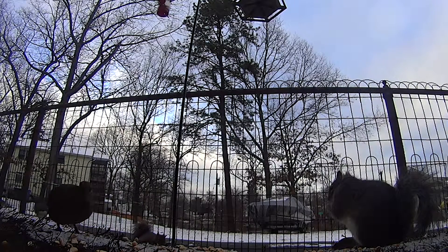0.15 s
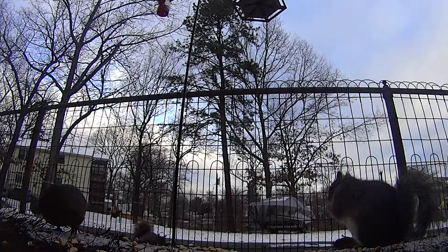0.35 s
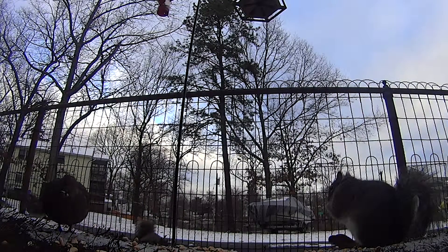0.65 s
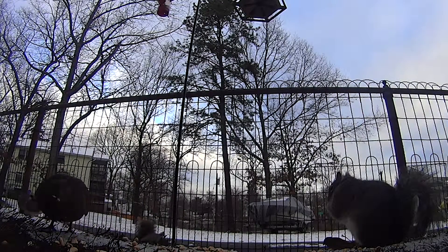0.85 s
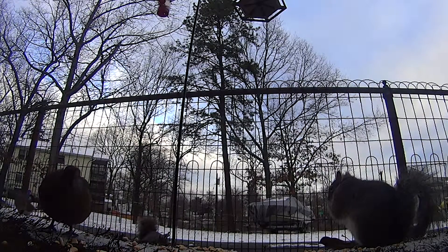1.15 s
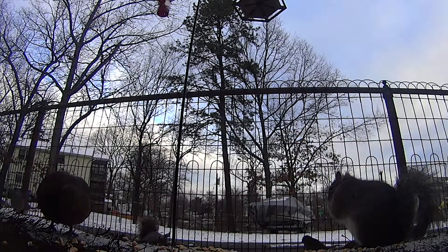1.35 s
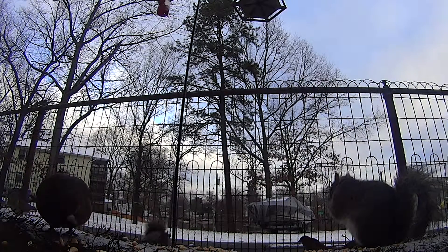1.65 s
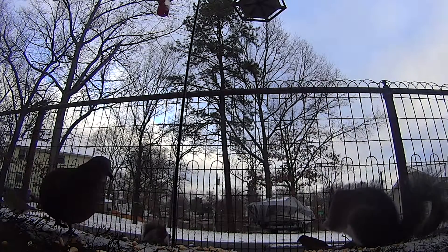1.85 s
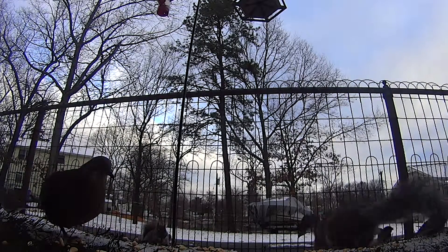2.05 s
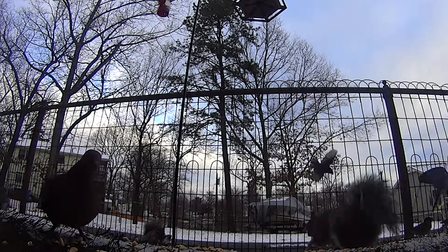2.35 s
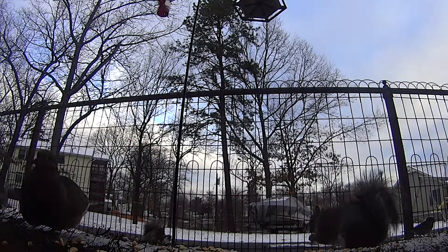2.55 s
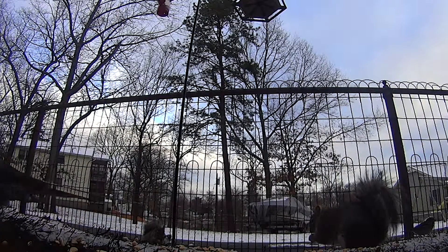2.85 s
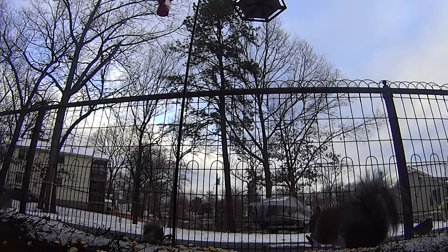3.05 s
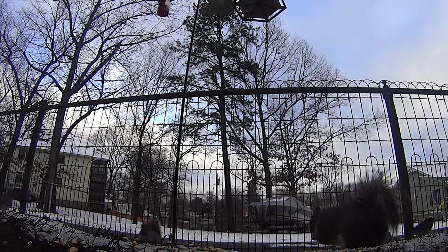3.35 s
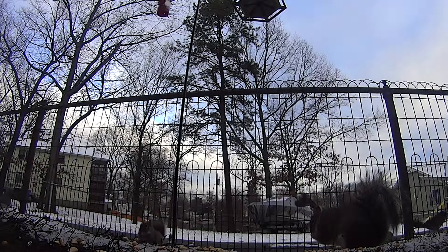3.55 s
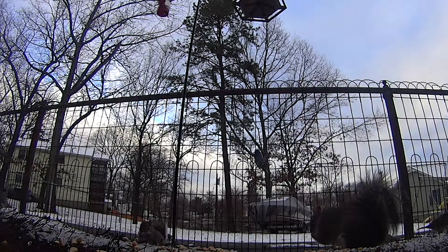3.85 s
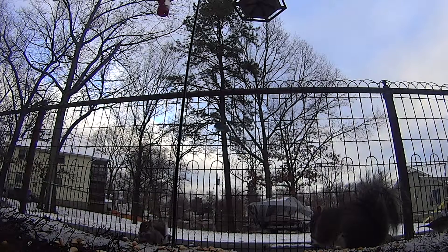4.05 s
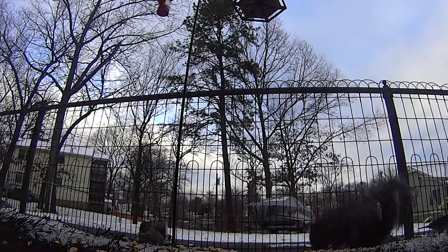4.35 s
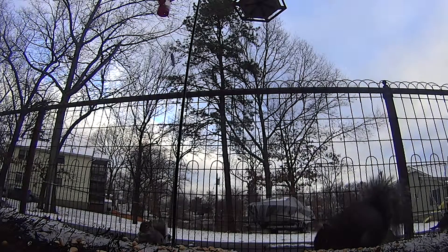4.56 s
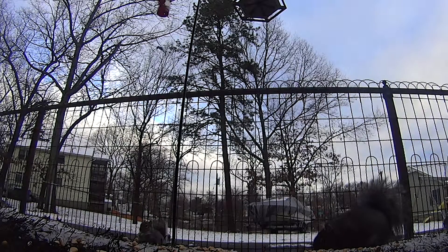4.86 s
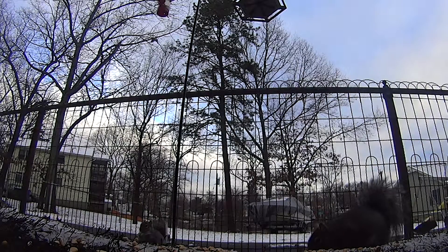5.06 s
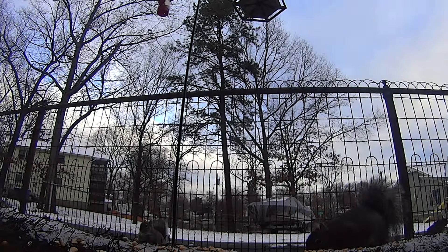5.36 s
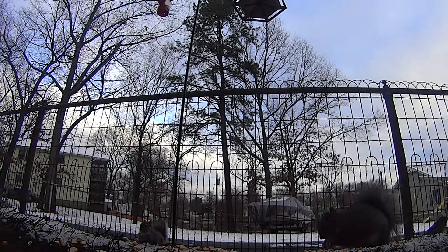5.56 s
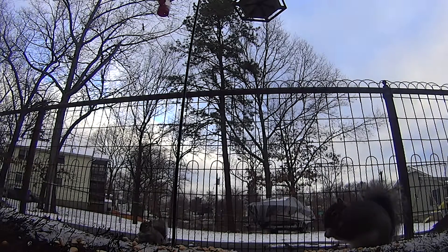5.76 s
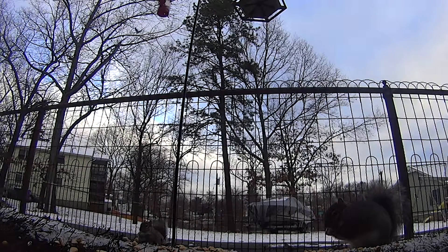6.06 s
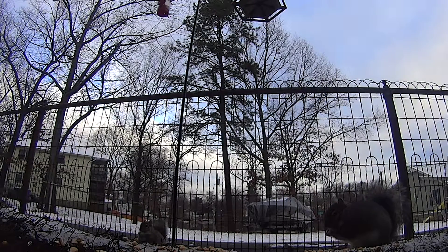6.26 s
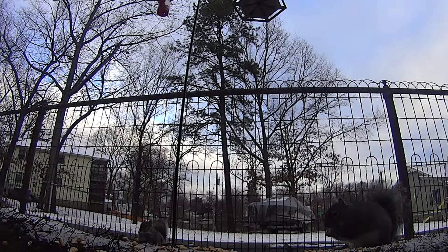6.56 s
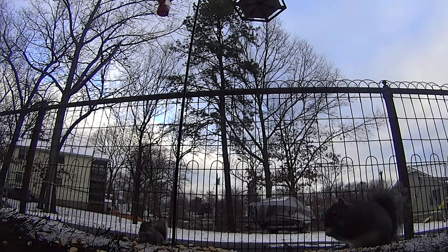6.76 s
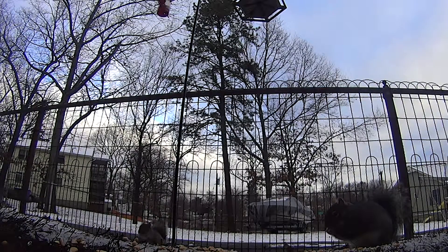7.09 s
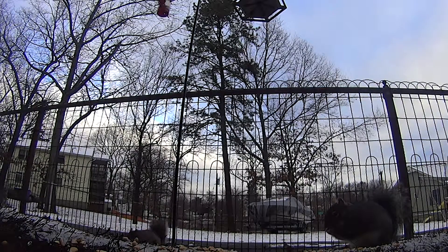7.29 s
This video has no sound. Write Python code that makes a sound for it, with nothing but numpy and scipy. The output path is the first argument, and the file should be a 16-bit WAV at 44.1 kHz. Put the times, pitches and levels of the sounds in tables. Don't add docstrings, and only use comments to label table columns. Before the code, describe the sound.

Quiet hiss with tiny seed clicks, then scuffling thumps, fluttering wing whistles, one sharp double snap up close, and the whistles fading away.

```python
import sys
import numpy as np
from scipy import signal
from scipy.fft import rfft, irfft, next_fast_len
from scipy.io import wavfile
from scipy.ndimage import uniform_filter1d

SR = 44100
rng = np.random.default_rng(int(sys.argv[2]) if len(sys.argv) > 2 else 0)


def digitize_waveform(pressure):
    field = np.atleast_2d(pressure).T
    bounded = np.clip(field, -1, 1)
    quanta = np.round(bounded * 32767).astype(np.int16)
    wavfile.write(sys.argv[1], SR, quanta)


def convert_level_to_amplitude(level_db):
    exponent = np.asarray(level_db, float) / 20
    return 10 ** exponent


N = 327507

CAVITY_HZ, CAVITY_T60_S, CAVITY_SIDE_DB = 1619, 0.018, -12
GROUND_HZ, GROUND_SIDE_DB = 296, 2.5


def level(x, db):
    return x * convert_level_to_amplitude(db) / np.sqrt(np.mean(np.abs(x) ** 2))


def decay(hz, t60, u):
    return np.exp((2j * np.pi * hz - np.log(1000) / t60) * u)


def mode(x, hz, t60):
    pole = np.exp(2j * np.pi * hz / SR - np.log(1000) / (t60 * SR))
    return signal.lfilter([1], [1, -pole], x)


def ports(z, side_db, middle_db=0):
    return np.array([convert_level_to_amplitude(middle_db) * z.imag, -convert_level_to_amplitude(side_db) * z.real])


def add(out, t, x):
    i = int(round(t * SR))
    out[..., i:i + x.shape[-1]] += x[..., :N - i]


def coloured(points, db):
    hz, gain_db = np.transpose(points)
    n = next_fast_len(N, True)
    f = np.arange(n // 2 + 1) * SR / n + 1
    gain = convert_level_to_amplitude(np.interp(np.log(f), np.log(hz), gain_db))
    return level(irfft(rfft(rng.standard_normal(n)) * gain, n)[:N], db)


def grains(size, rate, spread_db):
    hit = rng.random(size) < rate / SR
    size_db = spread_db * np.minimum(rng.exponential(size=size), 3.5)
    x = hit * rng.choice([-1., 1.], size) * convert_level_to_amplitude(size_db)
    return x / np.sqrt(np.mean(x ** 2) + 1e-12)


# pitch_hz, density_db (per Hz)
AIR_SPECTRUM = [(18, -37), (30, -4.5), (108, -0.5), (196, -2), (277, -5), (501, -9.5), (582, -9.5),
                (1350, -13.5), (1640, -9), (2150, -15), (6880, -17), (10200, -18), (11000, -20),
                (14300, -122), (22000, -120)]
# pitch_hz, density_db (per Hz)
HISS_SPECTRUM = [(18, -56.5), (30, -29.5), (233, -9), (291, -2.5), (329, -14.5), (373, -7.5), (596, -8),
                 (642, -7), (1640, -10), (11000, -28), (14300, -65.5), (22000, -120)]


def air_and_hiss():
    return np.array([coloured(AIR_SPECTRUM, -60.5), coloured(HISS_SPECTRUM, -58.5)])


# time_s, level_db (over calm)
RESTLESSNESS = [(0, 3), (.45, 1), (1.2, 1), (2.0, 5), (2.29, 12), (2.5, 9), (2.98, 4.5), (3.37, 10),
                (3.62, -1), (3.92, 9), (4.0, 26.5), (4.14, 9), (4.71, 4.5), (5.15, 0.5), (5.69, 3.5),
                (6.0, -3), (6.41, 4.5), (7.43, -0.5)]


def shuffle():
    calm_ground_db, calm_seed_db, seed_share = -73.5, -70, 0.7
    stir_db = np.interp(np.arange(N) / SR, *np.transpose(RESTLESSNESS))
    steps = uniform_filter1d(grains(N, rate=190, spread_db=2.5), size=30)
    ground = level(mode(steps, GROUND_HZ, t60=0.072), 0) * convert_level_to_amplitude(calm_ground_db + stir_db)
    seeds = grains(N, rate=600, spread_db=3.0)
    ticks = level(mode(seeds, CAVITY_HZ, t60=0.013), 0) + level(mode(seeds, 4880, t60=0.0048), -11)
    ticks = ticks * convert_level_to_amplitude(calm_seed_db + seed_share * stir_db)
    return ports(ground, GROUND_SIDE_DB) + ports(ticks, CAVITY_SIDE_DB)


def cavity_lift(hz):
    return 1 + 3 / (1 + ((hz - CAVITY_HZ) / 150) ** 2)


def downstroke(ms, hz, db, glide, arch):
    n = int(ms * SR / 1000)
    u = np.arange(2 * n) / n - 0.5
    chance = rng.standard_normal((4, 5000))
    wobble = 9 * uniform_filter1d(chance[:2], size=80)[:, :2 * n]
    far = np.clip((-db - 34.5) / 18, 0, 1)

    late = np.clip(u - 0.42, 0, 1)
    along = np.minimum(u, 0.5)
    held = hz + glide * along - 4 * arch * along ** 2
    collapse = np.maximum(held - 1500, 0) * np.tanh(late / 0.24)
    gathering = 140 * np.exp(-(u + 0.5) / 0.065)
    pitch = held - collapse - gathering + (25 + 20 * far) * wobble[0]
    phase = 2 * np.pi * np.cumsum(pitch) / SR

    fade = np.clip((u + 0.5) / 0.055, 0, 1) * np.exp(-late / 0.16)
    stroke = fade * convert_level_to_amplitude(db + (1 + 2.05 * far) * wobble[1] - 10.5 * u ** 2)
    other_wing = 0.27 * far * np.exp(1.055j * phase + 1j * wobble[1])
    both = np.exp(1j * phase) + other_wing
    lift = cavity_lift(pitch) / cavity_lift(hz)
    octave = convert_level_to_amplitude(-7.5) / (1 + ((2 * pitch - 4850) / 250) ** 2)
    swish = convert_level_to_amplitude(-47) * mode(chance[2, :2 * n], hz, t60=0.0061)
    swish += convert_level_to_amplitude(-42) * mode(chance[3, :2 * n], 4900, t60=0.0052)
    return ports(stroke * (lift * both + octave * np.exp(2j * phase) + swish), side_db=-13)


# centre_s, pitch_hz, peak_db
CLIMBING_DOVE = [(3.372, 2330, -65), (3.458, 2200, -64), (3.547, 2280, -65), (3.607, 2310, -66),
                 (3.75, 2120, -62), (3.82, 2355, -58.5), (3.898, 2350, -65), (4.054, 2350, -54),
                 (4.134, 2355, -57), (4.215, 2326, -56.5), (4.301, 2260, -57.5), (4.398, 2255, -57.5),
                 (4.487, 2380, -56.5), (4.576, 2230, -58.5), (4.677, 2194, -57.5), (4.81, 2200, -59.5),
                 (4.913, 2150, -60), (5.04, 2230, -61), (5.128, 2350, -59.5), (5.243, 2000, -61.5),
                 (5.411, 2090, -63.5), (5.575, 2010, -69), (5.755, 2120, -66.5)]
# centre_s, length_ms,
# pitch_hz, peak_db
GENTLE_STROKES = [(2.657, 34, 2120, -54), (3.76, 22, 1863, -55.5), (3.858, 24, 1914, -53),
                  (6.431, 15, 2120, -62), (6.513, 14, 2280, -61.5), (6.852, 16, 2100, -61),
                  (3.232, 53, 1850, -54), (3.328, 21.7, 1758, -39.5), (3.48, 17, 1760, -62),
                  (3.503, 13, 1680, -48), (3.566, 26, 1725, -61), (3.609, 35, 1750, -52),
                  (3.688, 31, 1847, -49.5), (3.948, 15, 2404, -32.5), (4.092, 36, 1524, -54),
                  (4.188, 11.5, 1650, -57), (4.273, 24, 1695, -59.5), (4.335, 16, 1620, -59),
                  (4.359, 14, 1800, -57.5), (4.432, 16, 1560, -60), (4.453, 16.3, 1840, -51.5),
                  (4.545, 20, 1665, -65), (4.638, 38, 1770, -64)]
# centre_s, length_ms, pitch_hz, peak_db
STARTLED_FLAPS = [(2.189, 24, 1960, -55.5), (2.263, 12, 1540, -52.5), (2.27, 19, 2120, -51.5),
                  (2.362, 24.3, 1940, -50.5), (2.757, 17, 2060, -58), (2.857, 16, 1970, -58),
                  (3.912, 15, 1850, -55), (6.194, 18, 2030, -68), (6.964, 14, 2050, -64)]


def wings():
    out = np.zeros((2, N))
    strokes = [(t, 35, hz, db, -170, 80) for t, hz, db in CLIMBING_DOVE]
    strokes += [(*row, -20, 120) for row in GENTLE_STROKES]
    strokes += [(t, ms, hz, db, -21.5 * ms, 120) for t, ms, hz, db in STARTLED_FLAPS]
    for t, ms, hz, db, glide, arch in strokes:
        add(out, t - ms / 2000, downstroke(ms, hz, db, glide, arch))
    return out


def footfall(db, hz, knock_db, heave_db, t60):
    u = np.arange(SR // 5) / SR
    a, b, c, e = rng.random(size=4)
    partials = [(hz, 0, max(t60, 0.02), 0), (hz * 1.284, -8, 0.06, a),
                (520 + 30 * b, knock_db, 0.04, 0), (670 + 30 * b, knock_db, 0.04, b),
                (900 + 200 * e, knock_db - 4, 0.02, 0)]
    ring = sum(convert_level_to_amplitude(g) * decay(f, d, u) * np.exp(2j * np.pi * turn) for f, g, d, turn in partials)
    heave = decay(66 + 10 * c, 0.21, u) + decay(112 + 20 * c, 0.21, u)
    heave = convert_level_to_amplitude(heave_db) * heave / 1.36
    push = 1 - np.exp(-u / 0.0024)
    return convert_level_to_amplitude(db + 2) * push * (ports(ring, GROUND_SIDE_DB) + ports(heave, side_db=-12))


# start_s, peak_db, ring_hz, knock_db (of the mount), heave_db
HOPS = [(2.012, -47.5, 243, -11, -23), (2.119, -49, 330, -9, -2.5), (2.147, -44, 286, -5.5, -18),
        (2.168, -46.5, 350, -13, -5.5), (2.182, -35, 302, -12.5, -18), (2.742, -46, 387, -0.5, -23),
        (2.753, -46.5, 250, -23, -27), (2.798, -44, 300, -9, -29), (3.057, -41, 306, -13.5, -26),
        (3.205, -36.5, 360, -5, -23), (3.241, -42, 202, -4, -12), (3.255, -39, 333, -21, -4.5),
        (3.265, -33.5, 314, -11, -13), (3.931, -38.5, 259, -6.5, -7.5), (3.942, -35.5, 320, -3.5, -22),
        (3.965, -38, 230, -3, -6), (3.978, -44.5, 402, -0.5, -16), (3.995, -41, 205, -15, -10),
        (4.022, -42.5, 306, -7, -16), (6.644, -48.5, 205, -7, -7)]
# start_s, peak_db, ring_hz
STEPS = [(0.464, -55.5, 238), (1.911, -59, 205), (2.363, -53, 227), (2.456, -54, 275), (2.924, -52, 283),
         (3.336, -46.5, 296), (4.576, -56, 290), (5.011, -50.5, 295), (5.204, -44, 294), (5.562, -58, 303),
         (5.606, -56.5, 218), (5.808, -54, 248), (6.317, -41.5, 270), (6.327, -41.5, 274), (6.44, -58, 250),
         (6.619, -49, 290), (7.194, -50.5, 280)]


def feet():
    out = np.zeros((2, N))
    for t, db, hz, knock_db, heave_db in HOPS:
        add(out, t, footfall(db, hz, knock_db, heave_db, t60=0.072))
    for t, db, hz in STEPS:
        add(out, t, footfall(db, hz, knock_db=-16, heave_db=-13.5, t60=0.12))
    return out


# start_s, cavity_peak_db
HUSKS = [(0.3513, -48), (0.4643, -49.5), (0.7758, -49), (.861, -54), (0.8866, -38), (0.926, -49),
         (0.932, -44.5), (1.509, -49), (1.6092, -50), (1.6935, -53), (1.714, -47.5), (1.733, -47),
         (1.995, -54), (4.694, -52), (5.4215, -50), (5.9422, -50), (6.0796, -49.5), (6.314, -55),
         (6.321, -43), (6.357, -47), (6.4068, -44.5), (6.547, -52), (6.5863, -45.5), (6.646, -49),
         (.705, -49)]
# start_s, cavity_peak_db, treble_db (relative)
KICKED_SEEDS = [(2.104, -56, -8), (2.127, -50, -15), (2.148, -46, -12), (2.1799, -47, -14),
                (2.445, -49, -6), (2.5194, -61, 6), (2.553, -47, -11), (2.589, -45, -6), (2.7406, -37, -9),
                (2.797, -47.5, -4), (3.2005, -56, -12), (3.2045, -56, 6), (3.2115, -53, 6),
                (3.2136, -40.5, -7), (3.2435, -36, 1), (3.2533, -38, -4), (3.2634, -31, -25),
                (3.6598, -47, -17), (3.787, -46, -4), (3.832, -48, -14), (4.034, -54, -8.5),
                (4.069, -45, -17), (4.15, -42.5, -14), (4.1786, -47, -12), (4.2327, -49, -10.5),
                (4.4039, -52.5, 3.5), (4.4744, -58, 10)]


def ticks(cavity, treble, dull):
    husks = [(t, db, -17 - 0.9 * (db + 51)) for t, db in HUSKS]
    for t, db, treble_db in husks + KICKED_SEEDS:
        touch = np.bincount([0, *rng.integers(8, 140, size=4)], [1, *rng.uniform(-0.35, 0.35, size=4)])
        add(cavity, t, convert_level_to_amplitude(db + 0.5) * touch)
        add(dull, t, convert_level_to_amplitude(db + treble_db - 7.5) * touch)
        add(treble, t, convert_level_to_amplitude(db + 2 * min(treble_db, 6) - 24) * touch)


# start_s, length_s, cavity_db, treble_db
SCRAPES = [(2.1, 0.035, -60, -65), (2.118, 0.15, -58, -62.5), (0.845, 0.08, -70, -80),
           (2.731, 0.035, -56, -62), (3.203, 0.013, -65, -51), (3.24, 0.044, -44, -44),
           (3.934, .012, -41.5, -47), (3.939, 0.021, -37, -37), (3.974, 0.0062, -37, -30),
           (3.987, 0.068, -52, -54.5), (4.006, 0.012, -47, -45), (4.06, 0.073, -61, -63),
           (6.311, 0.048, -63, -68)]


def scrapes(cavity, dull):
    u = np.arange(SR // 10) / SR
    for t, length, cavity_db, treble_db in SCRAPES:
        fade = np.clip(np.minimum(u / 0.00062, (length - u) / (0.57 * length)), 0, 1)
        seeds = grains(size=len(u), rate=3000, spread_db=4.3) * fade
        add(cavity, t, convert_level_to_amplitude(cavity_db - 13) * seeds)
        add(dull, t, convert_level_to_amplitude(treble_db - 21) * seeds)


# start_s, cavity_peak_db, treble_peak_db, cavity_t60_s, beat_hz
SNAPS = [
    (3.932, -35, -40, .012, 40),
    (3.944, -37, -23.5, 0.012, 39.8),
    (3.9487, -26, -25.5, 0.012, 40.2),
    (3.9671, -7, -12.5, 0.02, 76.4),
    (3.9789, -9, -16.5, 0.028, 47.7),
]


def snaps(out, treble, dull):
    u = np.arange(SR // 10) / SR
    first = 1. * (u == 0)
    cycle = round(SR / CAVITY_HZ)
    blow = 0.55 * first + 0.4 * np.roll(first, cycle) + 0.3 * np.roll(first, 2 * cycle)
    for t, cavity_db, treble_db, t60, beat in SNAPS:
        bounce = 0.7 * np.roll(first, round(0.0007 * SR))
        rattle = bounce + 0.06 * rng.standard_normal(len(u)) * np.exp(-u / 0.0015)
        pair = np.cos(np.minimum(np.pi * beat * u, 1.8))
        add(out, t, ports(pair * mode(convert_level_to_amplitude(cavity_db) * blow, CAVITY_HZ, t60), side_db=-15))
        add(treble if cavity_db > -20 else dull, t, convert_level_to_amplitude(treble_db - 7) * (first + rattle))


# pitch_hz, middle_db, side_db, t60_s
CASE_MODES = [(2350, -6, -17, 0.015), (2800, 6, 5, 0.0036), (3410, 2, 1, 0.0061), (3900, 3, 4, 0.0055),
              (4440, -3.5, -4, 0.0066), (4950, 7.5, -7.5, 0.0093), (5570, -5, -7, 0.0083),
              (7180, -5, -15, 0.0096), (8900, -34, -16, .01), (8700, -15, -20, 0.0048)]


def case():
    cavity, treble, dull, out = np.zeros(N), np.zeros(N), np.zeros(N), np.zeros((2, N))
    ticks(cavity, treble, dull)
    scrapes(cavity, dull)
    snaps(out, treble, dull)
    out += ports(mode(cavity, CAVITY_HZ, CAVITY_T60_S), CAVITY_SIDE_DB)
    out = signal.lfilter(*signal.butter(3, 1330, "high", fs=SR), out)
    treble += signal.lfilter([0.4], [1, -0.75], dull)
    treble = 1.4 * np.diff(uniform_filter1d(treble, size=3), prepend=0)
    shell = sum(ports(mode(treble, hz, t60), side_db, db) for hz, db, side_db, t60 in CASE_MODES)
    return out + shell * [[1], [-1]]


def scene():
    middle, side = air_and_hiss() + shuffle() + wings() + feet() + case()
    return np.array([middle + side, middle - side])


def roll_off(x):
    return signal.sosfilt(signal.butter(12, 12120, fs=SR, output="sos"), x)


def record(dry):
    steep = signal.ellip(8, 0.2, 50, 11050, fs=SR, output="sos")
    mix = signal.sosfilt(steep, dry)
    return roll_off(mix)


dry = scene()
out = record(dry)
digitize_waveform(out)
```